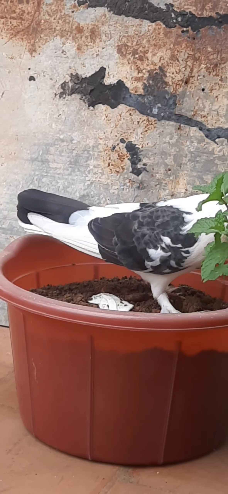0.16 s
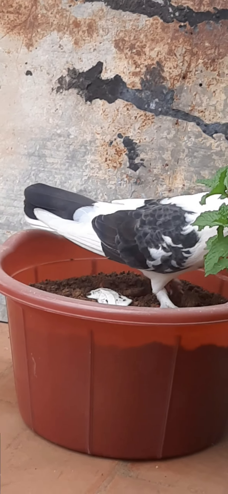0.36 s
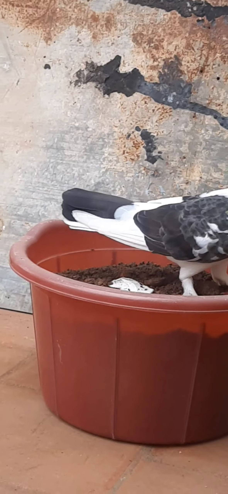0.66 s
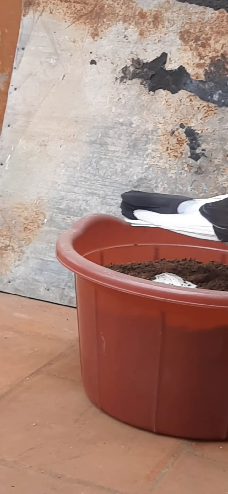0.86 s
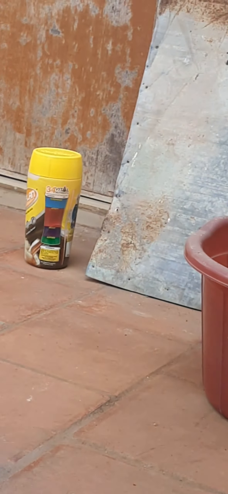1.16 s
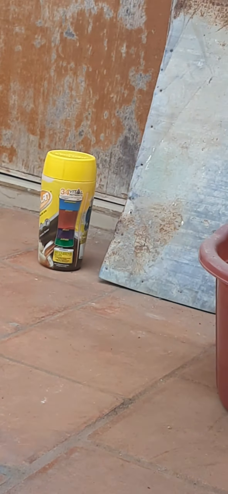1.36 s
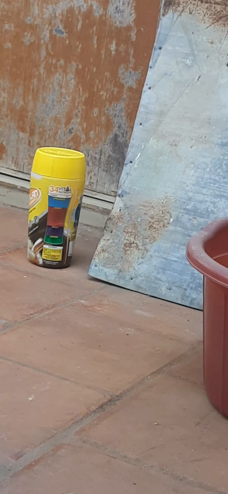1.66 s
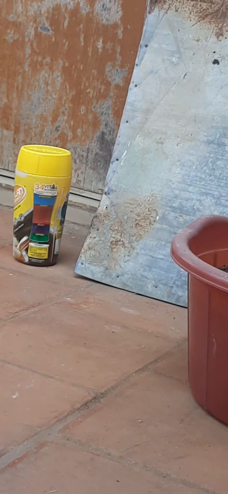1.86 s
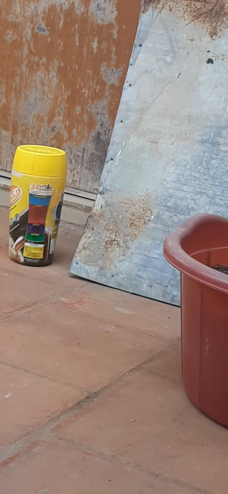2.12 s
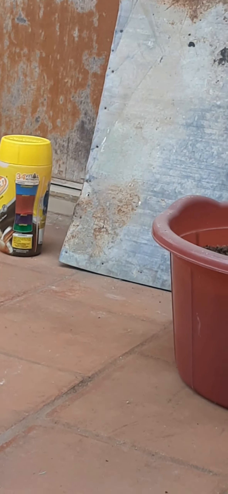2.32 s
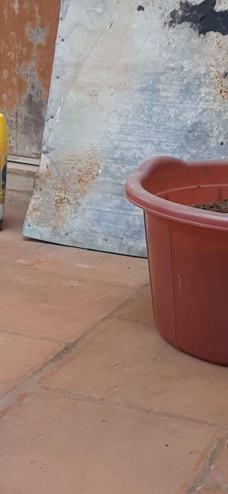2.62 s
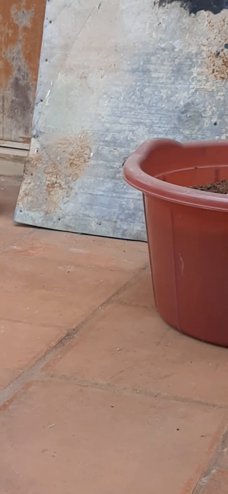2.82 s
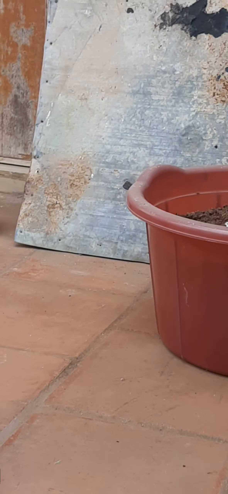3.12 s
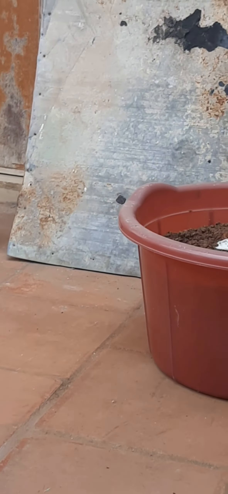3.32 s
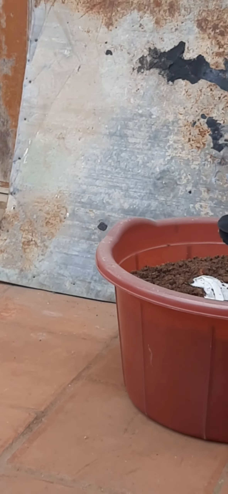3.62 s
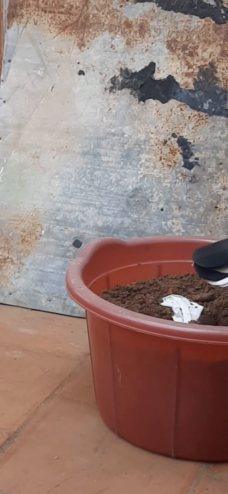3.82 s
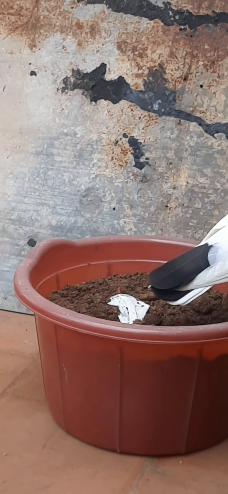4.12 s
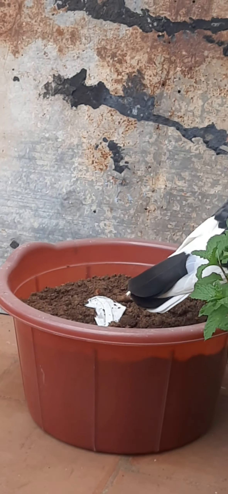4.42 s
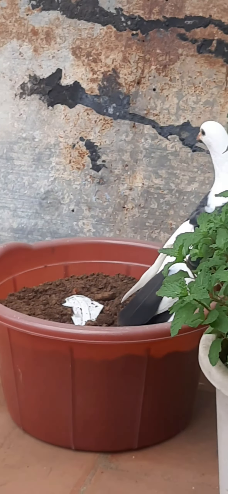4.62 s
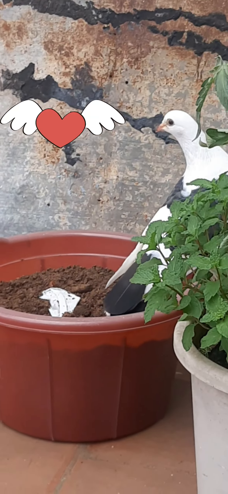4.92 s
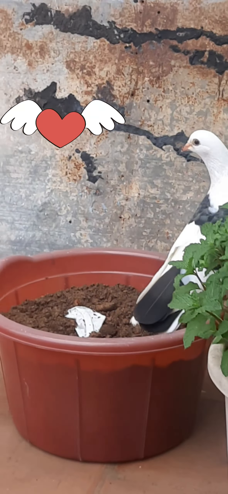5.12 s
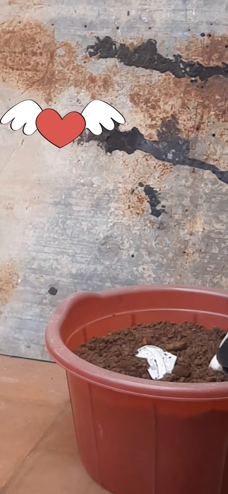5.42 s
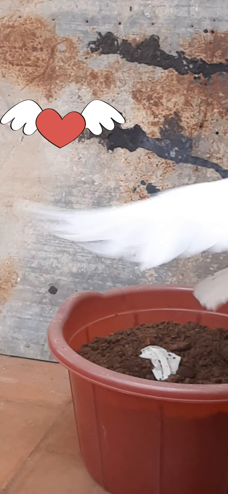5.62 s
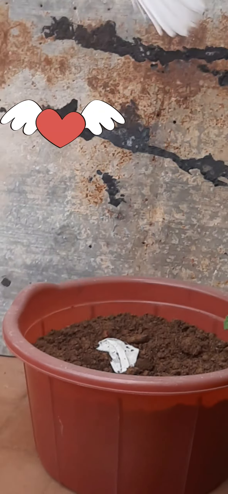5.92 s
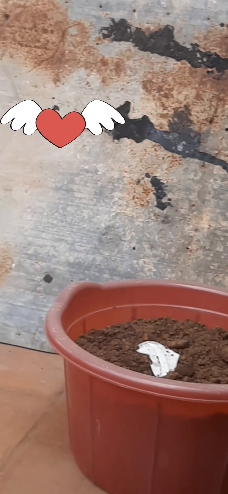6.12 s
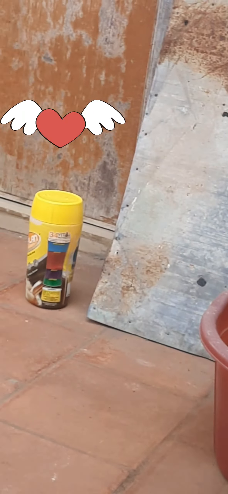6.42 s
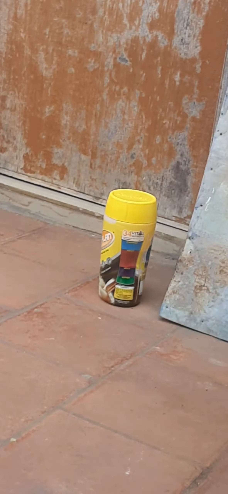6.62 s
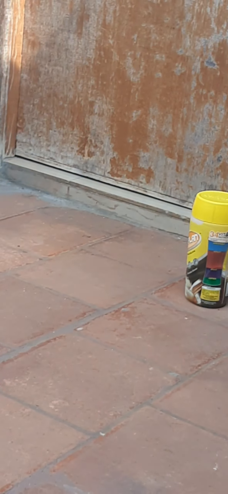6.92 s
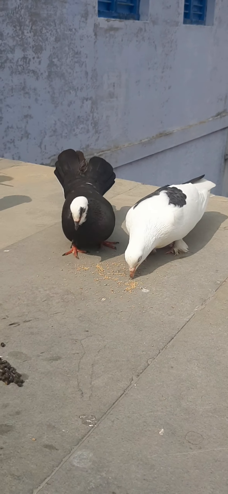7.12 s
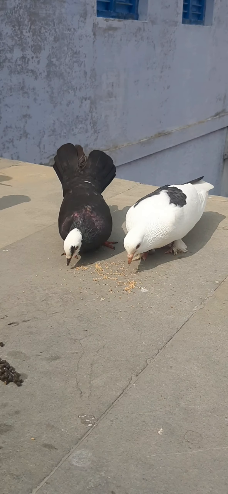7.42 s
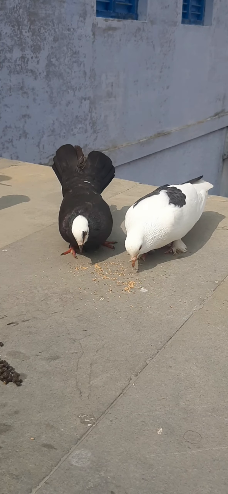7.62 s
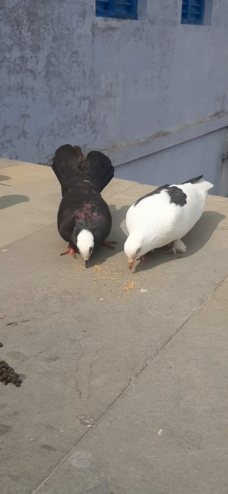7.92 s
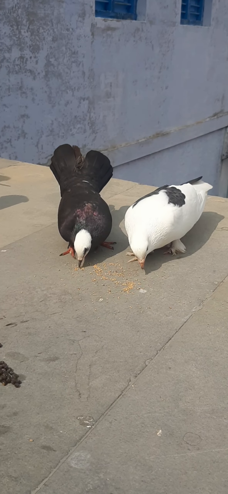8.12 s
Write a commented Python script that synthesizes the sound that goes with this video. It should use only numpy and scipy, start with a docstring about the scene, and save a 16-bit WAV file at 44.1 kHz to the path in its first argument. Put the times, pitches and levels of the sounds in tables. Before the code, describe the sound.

Small birds chirp busily in a tiled yard over faint traffic, then a pigeon takes off with loud wing claps; a brief gap, then quiet rooftop hum.

```python
"""Yard birds, pigeon take-off, quiet roof

Small birds chatter in a walled, tiled yard over distant traffic: gliding tones with wall echoes, over shaped noise.
A pigeon takes off: noise for rush and thump, short tones for whistling feathers, noise bursts for claps.
Meanwhile one bird gives a long clear call, a tone along a pitch curve.
After a short silence, a quiet flat roof: a wavering hum and a soft hiss of shaped noise, and a far tone.
"""
import sys
import numpy as np
from scipy import signal
from scipy.fft import rfft, irfft, next_fast_len
from scipy.io import wavfile
from scipy.ndimage import uniform_filter1d

SR = 44100
rng = np.random.default_rng(int(sys.argv[2]) if len(sys.argv) > 2 else 0)


def store_wav(level_fs):
    """Save 16-bit WAV to argv[1]."""
    pcm = np.round(np.clip(np.atleast_2d(level_fs), -1, 1) * 32767)
    wavfile.write(sys.argv[1], SR, pcm.T.astype(np.int16))


N = 364260


def gain_of(db):
    """Decibels to an amplitude factor."""
    return 10 ** (np.asarray(db) / 20)


def evened(x):
    """Scales to an rms of 1."""
    return x / np.sqrt(np.mean(x ** 2) + 1e-20)


def smooth_noise(count, size):
    """Slow random curve of rms 1: white noise averaged over size samples."""
    return evened(uniform_filter1d(rng.standard_normal(count), size=size))


def read(points, hz):
    """Interpolates a spectrum on a log-frequency axis."""
    f, value = np.transpose(points)
    return np.interp(np.log(hz + 1), np.log(f + 1), value)


def coloured(x, colour):
    """Zero-phase filter along a spectrum in dB."""
    size = next_fast_len(N)
    gain = gain_of(read(colour, np.fft.rfftfreq(size, 1 / SR)))
    return irfft(rfft(x, size) * gain, size)[..., :N]


def add(mix, start_s, sound):
    """Mixes a sound in at a time, cut at the end of the mix."""
    part = mix[..., round(start_s * SR):][..., :sound.shape[-1]]
    part += sound[..., :part.shape[-1]]


def level(rows, column):
    """Gain along one dB column of a time curve, silent outside its span."""
    rows = np.array(rows)
    return gain_of(np.interp(np.arange(N) / SR, rows[:, 0], rows[:, column], left=-200, right=-200))


# left-right likeness: (frequency [Hz], correlation [-1 to 1])
STEREO_LIKENESS = [(60, .985), (150, .96), (300, .75), (600, .35), (1400, -.15), (3500, 0)]


def stereo(left, other, hz):
    """Left and right spectra: the right shares part of the left, most in the bass."""
    same = read(STEREO_LIKENESS, hz)
    return np.array([left, same * left + np.sqrt(1 - same ** 2) * other])


def noise(colour, patchy_db):
    """Two-channel coloured noise of rms 1, its level drifting in patches of time and frequency."""
    frames, hz = N // 128 + 5, np.fft.rfftfreq(512, 1 / SR)
    a, b, c, d, patches = rng.standard_normal((frames, 257, 5)).T
    patches = uniform_filter1d(patches, size=6, axis=0)  # over frequency
    patches = evened(uniform_filter1d(patches, size=12, axis=1))  # over time
    spectra = stereo(a + 1j * b, c + 1j * d, hz[:, None]) * gain_of(patchy_db * patches)
    patchy = signal.istft(spectra, nperseg=512, noverlap=384)[1][:, :N]
    return evened(coloured(patchy, colour))


def tone(hz, wobble, overtones_db):
    """Harmonic whistle of rms 1 whose pitch trembles by an rms share of itself."""
    tremble = uniform_filter1d(rng.standard_normal(len(hz)), size=40)
    tremble = evened(uniform_filter1d(tremble, size=40))
    turns = np.cumsum(hz * (1 + wobble * tremble)) / SR + rng.random()
    harmonics = [gain_of(db) * np.sin(2 * np.pi * (k + 1) * turns) for k, db in enumerate(overtones_db)]
    return evened(sum(harmonics))


GLIDE_EASE = 0.7  # share by which a glide lingers on its first and last pitch


def note(length_s, start_hz, end_hz, db, wobble, overtones_db, swell):
    """One glide: sets in at once, swells by a share, fades, and throbs more the more it trembles."""
    u = np.arange(round(length_s * SR)) / round(length_s * SR)
    eased = (1 - GLIDE_EASE) * u + GLIDE_EASE * np.sin(np.pi * u / 2) ** 2
    hz = start_hz * (end_hz / start_hz) ** eased
    attack = np.minimum(u * length_s / 0.00044, 1)
    arch = 1 - swell + swell * np.sin(np.pi * u)
    release = np.minimum((1 - u) / 0.042, 1)
    throb_db = (0.61 + 40 * wobble) * smooth_noise(len(hz), 70)
    return gain_of(db) * evened(gain_of(throb_db) * tone(hz, wobble, overtones_db)) * attack * arch * release


# echo decay: (frequency [Hz], time to fall 60 dB [s])
YARD_DECAY = [(300, 0.3281), (1500, 0.2209), (4000, 0.2096), (12000, 0.1963)]


def yard(x, first_s):
    """Sparse echoes of random sign from the walls, falling away ever faster."""
    taps = np.zeros((2, SR // 2))
    at = np.arange(round(first_s * SR), SR // 2 - 20, 20)
    at = at + rng.integers(0, 20, (2, len(at)))
    np.put_along_axis(taps, at, rng.choice([-1., 1.], at.shape), 1)
    hz, t, (left, other) = signal.stft(taps, SR, nperseg=256)
    decay_db = -60 * (t / read(YARD_DECAY, hz)[:, None]) ** 1.25
    tail = signal.istft(stereo(left, other, hz[:, None]) * gain_of(decay_db), SR, nperseg=256)[1]
    return signal.fftconvolve(x[None], tail / np.linalg.norm(tail[0]), axes=1)[:, :N]


# (time [s], level [dB])
TRAFFIC_LEVEL = [(0, -56), (4, -57), (4.05, -60), (5.6, -60), (5.7, -44.5)]
# (frequency [Hz], relative density [dB per Hz])
TRAFFIC_SPECTRUM = [(20, -30.5), (60, 3.5), (110, -4), (190, -2.5), (450, -16), (1000, -26.5),
                    (1500, -15.5), (3000, -38)]


def traffic():
    """Distant traffic: low patchy noise along a level curve."""
    return level(TRAFFIC_LEVEL, 1) * noise(TRAFFIC_SPECTRUM, 3.24)


# fine fizz at the very top: (time [s], level [dB])
FIZZ_LEVEL = [(0, -99), (2.3, -90), (2.4, -63), (3.9, -62), (4.5, -65), (4.9, -84.5), (5.6, -86)]
# (frequency [Hz], relative density [dB per Hz])
FIZZ_SPECTRUM = [(7000, -30), (10000, -7.5), (16000, -9.5)]


def fizz():
    """Treble noise along a drifting level curve."""
    return level(FIZZ_LEVEL, 1) * noise(FIZZ_SPECTRUM, 1.43)


# short puffs of hiss among the calls and knocks: (peak time [s], hold [s], level [dB])
HISS_PUFFS = [(0.347, .03, -55.5), (0.679, 0.0077, -50.5), (0.925, 0.074, -66), (1.395, .04, -69),
              (1.528, 0.034, -55), (1.946, 0.066, -35), (2.263, 0.022, -43.5), (2.767, 0.043, -54),
              (3.334, 0.013, -45), (4.044, 0.028, -46.5), (4.296, 0.084, -57.5), (4.907, 0.022, -46),
              (5.623, 0.062, -52)]
PUFF_RISE_DB_PER_S, PUFF_FALL_DB_PER_S = 494, 247


def puffs():
    """Hiss gain: each puff rises fast, holds and falls away."""
    t, gain = np.arange(N) / SR, np.zeros(N)
    for peak_s, hold_s, db in HISS_PUFFS:
        rise_db = PUFF_RISE_DB_PER_S * np.maximum(peak_s - t, 0)
        fall_db = PUFF_FALL_DB_PER_S * np.maximum(t - peak_s - hold_s, 0)
        gain += gain_of(db - rise_db - fall_db)
    return gain


# slowly changing hiss under the puffs: (time [s], level [dB])
HISS_LEVEL = [(0, -65.5), (1.1, -71), (1.75, -73.5), (2.3, -65.5), (2.65, -65.5), (3.45, -56), (4.3, -70),
              (4.85, -71), (5.43, -72.5), (5.62, -74.5)]
# (frequency [Hz], relative density [dB per Hz])
HISS_SPECTRUM = [(300, -22), (800, -47.5), (2000, 2), (4000, 12), (7000, 7), (11000, 5.5), (16000, 7.5)]


def hiss():
    """Broad patchy noise: a slowly changing bed plus puffs."""
    return (level(HISS_LEVEL, 1) + puffs()) * noise(HISS_SPECTRUM, 2.6)


# (time [s], hum level [dB], hiss level [dB])
ROOF_LEVELS = [(7.058, -53, -53), (7.09, -46, -47.5), (7.19, -53.5, -49), (7.21, -50, -67.5),
               (7.7, -50, -63.5), (7.84, -46, -56.5), (8.01, -40, -56.5), (8.15, -48.5, -55),
               (8.17, -46, -47.5), (8.26, -45.5, -56)]
# (frequency [Hz], relative density [dB per Hz])
ROOF_HUM_SPECTRUM = [(30, -36.5), (70, -8), (100, 6.5), (135, -6.5), (190, -10), (330, -17.5), (500, -26.5),
                     (800, -20.5), (2000, -45)]
ROOF_HISS_SPECTRUM = [(500, -5), (2000, 0.5), (4000, -5.5), (8000, -9.5), (9500, -11.5), (16000, -14.5)]
# far tone, on and off: (time [s], length [s], level [dB])
FAR_TONE_NOTES = [(7.09, 0.036, -60.5), (7.18, 0.0954, -60.5), (7.33, 0.022, -75.5), (7.43, 0.026, -62.5),
                  (7.66, 0.0614, -62), (7.78, 0.033, -64)]
FAR_TONE_HZ = 734


def roof():
    """Wavering hum and soft hiss as shaped noise, and a far pure tone."""
    far = np.zeros(N)
    for s, length_s, db in FAR_TONE_NOTES:
        add(far, s, note(length_s, FAR_TONE_HZ, FAR_TONE_HZ, db, 0.0069, [0], 0.233))
    hum = level(ROOF_LEVELS, 1) * noise(ROOF_HUM_SPECTRUM, 1.2)
    soft_hiss = level(ROOF_LEVELS, 2) * noise(ROOF_HISS_SPECTRUM, 2.2)
    return far + hum + soft_hiss


CHATTER_COUNT, CHATTER_DB, CHATTER_UNTIL_S = 60, -73, 5  # loudest level, before the echo gain
CHATTER_LOW_HZ, CHATTER_HIGH_HZ = 1354.5, 2513.5  # range of the end pitches
# chirps: (time [s], length [s], start [Hz], end [Hz], level before mix [dB], roughness [0 = clear, 1 = rough])
CHIRP_NOTES = [(0.0, 0.035, 4615, 4140, -53, 0.76), (0.12, 0.0345, 2406, 1587, -70.5, 0.83),
               (0.22, 0.0995, 1902, 2135, -72, 0), (0.33, 0.0327, 2018, 2035, -62.5, 0.68),
               (0.443, 0.0135, 3400, 2234, -56.5, 0.83), (0.51, 0.024, 3365, 3250, -58.5, 0.88),
               (0.547, 0.0368, 3935, 3708, -53.5, 0.88), (0.56, 0.0167, 2913, 1742, -57.5, 0.57),
               (0.59, 0.0236, 3631, 3748, -48, 0.59), (0.632, 0.0808, 3317, 2142, -50, 0.49),
               (0.84, 0.0397, 4615, 5048, -54.5, 0.65), (0.874, 0.0442, 4234, 3922, -45.5, 0.52),
               (0.935, 0.0419, 3930, 2563, -48, 0.35), (0.99, 0.0352, 2270, 3255, -53.5, 0.65),
               (1.147, 0.0255, 3364, 1729, -60.5, 0.95), (1.21, 0.01395, 3528, 3290, -65.5, 1.17),
               (1.35, 0.0395, 1959, 1442, -70.5, 1.07), (1.41, 0.0167, 2516, 2383, -67, 0.88),
               (1.495, 0.0727, 3195, 3302, -54, 0.65), (1.53, 0.0262, 2980, 2283, -52.5, 0.08),
               (1.56, 0.0127, 4523, 4363, -50, 0.55), (1.715, 0.0387, 1784, 2181, -59, 0.18),
               (1.77, 0.0313, 1752, 1570, -55, 0.52), (1.79, 0.0252, 3143, 3071, -61, 1.01),
               (1.92, 0.0482, 1864, 1754, -56.5, 0.37), (1.92, 0.0958, 4420, 4296, -51, 1.28),
               (2.005, 0.0757, 2597, 1460, -51, 0.34), (2.07, 0.0448, 3306, 3347, -54, 1.1),
               (2.137, 0.0536, 2950, 2699, -49.5, 0.56), (2.17, 0.0459, 2774, 1583, -50.5, 0.42),
               (2.32, 0.065, 2156, 2641, -61, 0.58), (2.342, 0.0124, 2662, 4520, -56, 0.1),
               (2.36, 0.03, 3557, 3299, -54.5, 0.82), (2.4, 0.0204, 2100, 2079, -60.5, 0.96),
               (2.64, 0.0457, 1407, 1468, -69.5, 0.71), (2.74, 0.0706, 2393, 1817, -66.5, 0.62),
               (2.825, 0.0265, 2729, 2841, -58.5, 0.54), (2.87, 0.00704, 3508, 3507, -54.5, 0.48),
               (2.88, 0.0398, 2386, 2497, -64, 0.81), (2.98, 0.054, 2400, 2205, -64.5, 0.53),
               (3.055, 0.0242, 3569, 2376, -60, 0.73), (3.08, 0.0255, 2377, 2177, -60.5, 0.84),
               (3.205, 0.0621, 3558, 3049, -48.5, 0.65), (3.283, 0.048, 3126, 3650, -43, 0.55),
               (3.23, 0.0364, 2071, 2125, -55, 0.51), (3.24, 0.082, 4205, 4524, -52, 0.7),
               (3.325, 0.0394, 4040, 4618, -39.5, 0.79), (3.535, 0.073, 1577, 1543, -70, 0.46),
               (3.683, 0.035, 3310, 1819, -69, 0.4), (3.822, 0.0125, 3443, 2608, -64, 1.11),
               (3.86, 0.051, 2039, 1972, -63, 0.42), (4.045, 0.0217, 4150, 3994, -39.5, 0.32),
               (4.025, 0.032, 4880, 4980, -58.5, 0.41), (4.022, 0.0303, 4260, 3621, -50, 0.49),
               (4.06, 0.067, 3549, 3322, -44, 0.38), (4.128, 0.0188, 3916, 4099, -39.5, 0.8),
               (4.275, 0.0365, 1490, 1424, -65.5, 1.1), (4.275, 0.0665, 2084, 2392, -62, 0.79),
               (4.285, 0.0335, 2801, 3153, -60, 0.67), (4.38, 0.0257, 2440, 2436, -63.5, 0.65),
               (4.425, 0.082, 3663, 3602, -71.5, 0.65), (4.43, 0.086, 1795, 2085, -69.5, 0.43),
               (4.56, 0.0287, 2909, 3105, -61.5, 0.93), (4.6, 0.0288, 2329, 1894, -68, 0.68),
               (4.69, 0.049, 2929, 2734, -70.5, 0.8), (4.718, 0.028, 1925, 1897, -73, 0.17),
               (4.75, 0.041, 2338, 2613, -65.5, 0.69), (4.873, 0.0657, 5640, 5590, -58.5, 1.12),
               (4.9, 0.032, 3689, 2429, -53.5, 0.83), (4.905, 0.03544, 4764, 4094, -47, 0.88),
               (4.995, 0.0483, 4401, 2960, -56, 0.42), (5.03, 0.0226, 2990, 2903, -56, 0.54),
               (5.042, 0.032, 3623, 2044, -62, 0.87), (5.05, 0.0239, 4487, 4492, -58, 0.55),
               (5.2, 0.0538, 1736, 1650, -75, 0.65), (5.22, 0.058, 4970, 5190, -78.5, 0.1),
               (5.33, 0.125, 5282, 5200, -91.5, 0.21), (5.475, 0.0293, 2320, 2010, -70.5, 0.86),
               (5.6, 0.0847, 3955, 2420, -55, 0.71), (5.75, 0.0292, 2121, 2547, -60.5, 0.57)]
# harmonics from the fundamental up: (level [dB])
CHIRP_HARMONICS_DB = [3.5, -17.5, -22]
# air escaping with a chirp: (frequency [Hz], relative density [dB per Hz])
LEAK_SPECTRUM = [(900, -46.5), (1700, -9), (4500, 12), (9000, -19)]
# per perch: (left side delay [samples])
LEFT_LAGS = [4, -16, -20]


def birds():
    """Chirps from three perches, each with its own echoes; rough ones leak air; further birds are echo only."""
    perches, leak = np.zeros((3, N)), np.zeros(N)
    for k, (s, length_s, start_hz, end_hz, db, rough) in enumerate(CHIRP_NOTES):
        wobble = 0.011 + 0.085 * rough ** 2
        add(perches[k % 3], s, note(length_s, start_hz, end_hz, db, wobble, CHIRP_HARMONICS_DB, 0.471))
        add(leak, s, gain_of(db - 6) * rough ** 6.6 * signal.windows.tukey(round(length_s * SR), 0.3))
    perches[0] += leak * noise(LEAK_SPECTRUM, 3.5)[0]
    left = sum(np.roll(p, lag) for p, lag in zip(perches, LEFT_LAGS))
    direct = np.array([left, perches.sum(0)])
    for k, (when, pitch, fall, size) in enumerate(rng.random((CHATTER_COUNT, 4))):
        hz = CHATTER_LOW_HZ * (CHATTER_HIGH_HZ / CHATTER_LOW_HZ) ** pitch
        far = note(0.022, hz * (1 + 0.58 * fall), hz, CHATTER_DB - 9 * size, 0.1, CHIRP_HARMONICS_DB, 0.28)
        add(perches[k % 3], (k + when) / CHATTER_COUNT * CHATTER_UNTIL_S, far)
    return gain_of(11) * direct + gain_of(14.5) * sum(yard(p, 0.002) for p in perches)


# long clear call: (time [s], pitch [Hz], level before mix [dB])
CALL_CURVE = [(6.327, 1570, -56), (6.402, 1409, -50), (6.455, 1394, -46), (6.52, 1729, -50),
              (6.571, 2050, -49), (6.605, 2286, -43), (6.635, 2283, -49.5), (6.647, 2025, -50),
              (6.672, 1777, -45)]
# harmonics from the fundamental up: (level [dB])
CALL_HARMONICS_DB = [4.5, 1, -9.5]
# throat: (frequency [Hz], gain [dB])
THROAT_RESPONSE = [(1300, 3), (2300, 4), (2900, -0.5), (3600, 1), (4600, -13.5)]


def long_call():
    """A whistle that dips, climbs and drops; overtones fade as they climb past the throat's range."""
    s, hz, db = np.transpose(CALL_CURVE)
    t, out = np.arange(s[0], s[-1], 1 / SR), np.zeros(N)
    pitch_hz = uniform_filter1d(np.interp(t, s, hz), size=500, mode="nearest")
    throb_db = 2.5 * smooth_noise(len(t), 300)
    call = gain_of(np.interp(t, s, db) + throb_db) * tone(pitch_hz, 0.00307, CALL_HARMONICS_DB)
    add(out, s[0], call * signal.windows.tukey(len(t), 0.05))
    out = coloured(out, THROAT_RESPONSE)
    direct = np.array([np.roll(out, -16), out])  # left 16 samples early
    return gain_of(3.5) * direct + gain_of(6.0) * yard(out, 0.004055)


# downstroke whistles: (time [s], length [s], start [Hz], end [Hz], level before mix [dB])
WHISTLE_NOTES = [(5.704, 0.025, 885.5, 833, -43), (5.767, 0.0168, 497, 606, -43.5),
                 (5.832, 0.0299, 675, 918.4, -32), (5.952, 0.0624, 942, 752.3, -37.5),
                 (6.072, 0.0287, 832.4, 751, -34.5), (6.207, 0.0453, 675.4, 794.4, -33),
                 (6.349, 0.051, 785, 708.5, -41.5), (6.715, 0.0344, 624.7, 649, -42),
                 (6.992, 0.058, 980, 1075, -45.5)]
# harmonics from the fundamental up: (level [dB])
WHISTLE_HARMONICS_DB = [-1.5, -8, -20]


def wing_whistles():
    """Feathers whistling on the downstroke: short trembling glides."""
    whistles = np.zeros(N)
    for s, length_s, start_hz, end_hz, db in WHISTLE_NOTES:
        add(whistles, s, note(length_s, start_hz, end_hz, db, 0.03, WHISTLE_HARMONICS_DB, 0.5))
    return whistles


# wing claps, fainter knocks and scuffs: (time [s], relative level [dB], burst scale [s], tilt [dB per octave])
CLAP_BURSTS = [(0.323, -49.5, 0.144, -3), (2.251, -27, 0.00746, 4), (2.317, -37, 0.01002, -4),
               (3.818, -52.5, 0.0292, 1.5), (5.816, -29.5, 0.0049, 7), (5.916, -9.5, 0.0081, 1),
               (6.036, -9.5, 0.00797, 2), (6.162, -11, 0.008, 0), (6.306, -12.5, .007, 0.5),
               (6.448, -26, 0.00565, 0.5), (6.671, -33, 0.0124, -1), (6.821, -19.5, 0.0083, -0.5),
               (6.969, -13, 0.00455, 2.5)]
# (frequency [Hz], relative density [dB per Hz])
CLAP_SPECTRUM = [(60, -5), (150, -4.5), (300, -2.5), (1000, -2), (2500, -3), (6000, -4), (16000, -8.5)]


def wing_claps():
    """Short noise bursts with ragged, randomly flickering loudness."""
    claps = np.zeros((2, N))
    for s, db, scale_s, tilt_db in CLAP_BURSTS:
        u = np.arange(round(4 * scale_s * SR)) / (scale_s * SR)
        shape = np.minimum(u / 0.3, 1) / (1 + (u / 1.261) ** 6)
        shape = shape * evened(gain_of(2.8 * smooth_noise(len(u), 30)))  # flicker
        hz = np.fft.rfftfreq(len(u) + 1024, 1 / SR)
        colour_db = read(CLAP_SPECTRUM, hz) + tilt_db * np.log2(np.maximum(hz, 150) / 3000)
        left, other = rfft(rng.standard_normal((2, len(u) + 1024)))
        burst = irfft(stereo(left, other, hz) * gain_of(colour_db))[:, :len(u)]
        add(claps, s, gain_of(db - 5.5) * shape * evened(burst))
    return claps


BEAT_THUMP_DB, BEAT_LAG_S, BEAT_WIDTH_S = 8, 0.0203, 0.0124


def beats():
    """A bump of height 1 just after the start of each clap."""
    t = np.arange(N) / SR
    return np.max([np.exp(-((t - row[0] - BEAT_LAG_S) / BEAT_WIDTH_S) ** 2) for row in CLAP_BURSTS], axis=0)


# (time [s], feather rush level [dB], air thump level between beats [dB])
FLIGHT_LEVELS = [(5.52, -63.5, -86), (5.678, -51.5, -38.5), (5.85, -34, -42.5), (6.066, -35.5, -34),
                 (6.226, -43.5, -43.5), (6.562, -41.5, -40), (7.008, -45.5, -54), (7.03, -79, -49.5)]
# (frequency [Hz], relative density [dB per Hz])
RUSH_SPECTRUM = [(200, -2), (600, 1.5), (1500, 0), (3000, -5), (7000, -11.5), (16000, -11)]
THUMP_SPECTRUM = [(20, -25.5), (55, 3.5), (110, -2.5), (200, -14), (400, -22.5)]


def wing_air():
    """Feather rush as broad noise; air thump as low noise that swells with each clap."""
    rush = level(FLIGHT_LEVELS, 1) * noise(RUSH_SPECTRUM, 2.5)
    thump = level(FLIGHT_LEVELS, 2) * gain_of(BEAT_THUMP_DB * beats()) * noise(THUMP_SPECTRUM, 1.2)
    return rush + thump


def pigeon():
    """Wing air, claps and whistles; the walls return claps and whistles."""
    whistles, claps = wing_whistles(), wing_claps()
    echoes = yard(claps[0] + gain_of(-7.0) * whistles, 0.006)
    return wing_air() + claps + gain_of(-4) * whistles + gain_of(-3.5) * echoes


YARD_END_S, ROOF_START_S, YARD_FADE_S = 7.029, 7.058, 0.00248


def scene():
    """The yard, a short silence, then the roof."""
    t = np.arange(N) / SR
    fade = np.clip((YARD_END_S - t) / YARD_FADE_S, 0, 1)
    yard_mix = traffic() + fizz() + hiss() + birds() + long_call() + pigeon()
    return fade * yard_mix + (t > ROOF_START_S) * roof()


# treble response: (frequency [Hz], gain [dB])
TREBLE_RESPONSE = [(6000, 1.5), (7800, 0.5), (8300, -8), (9500, -7), (11000, -2.5), (13000, -0.5),
                   (16000, -0.5)]
BAND_LIMIT_HZ = 16000


def record(dry):
    """Treble response: a step down near 8 kHz, recovering by 13 kHz; then the band limit."""
    hz = np.r_[np.fft.rfftfreq(257, 1 / SR), SR / 2]
    treble = signal.firwin2(511, hz, gain_of(read(TREBLE_RESPONSE, hz)), fs=SR)
    band_limit = signal.firwin(511, BAND_LIMIT_HZ, window=("kaiser", 9), fs=SR)
    return signal.oaconvolve(signal.oaconvolve(dry, treble[None], "same"), band_limit[None], "same")


dry = scene()
out = record(dry)
store_wav(out)
```